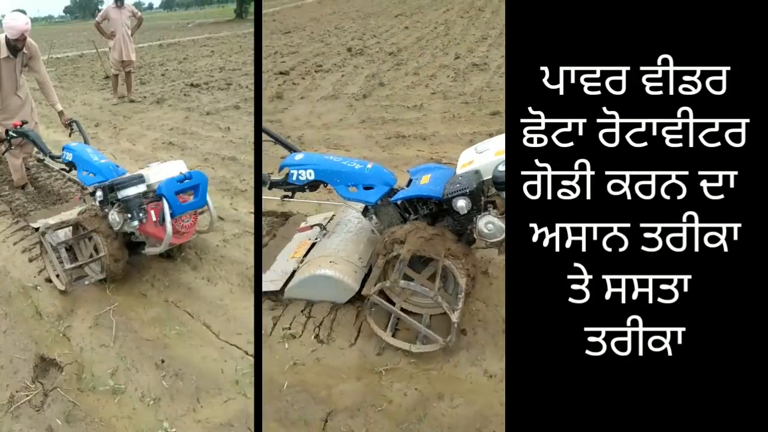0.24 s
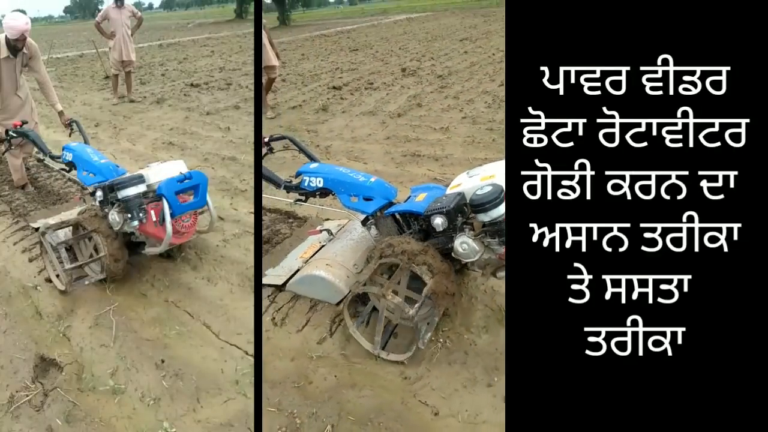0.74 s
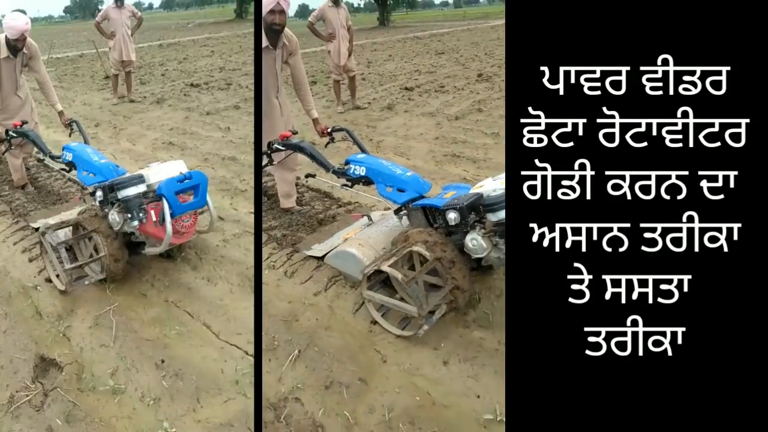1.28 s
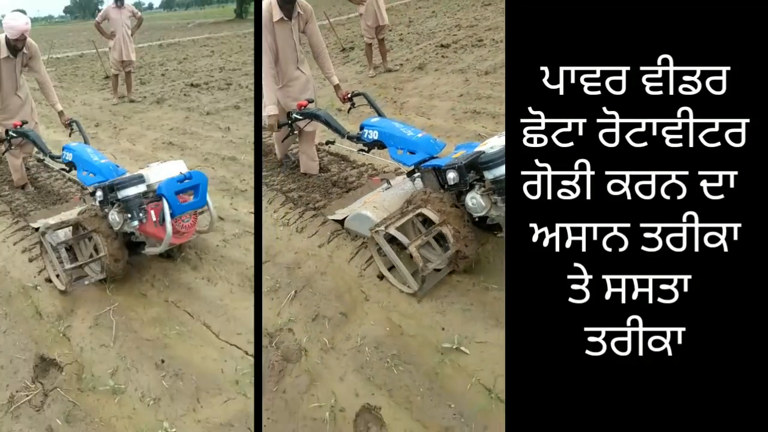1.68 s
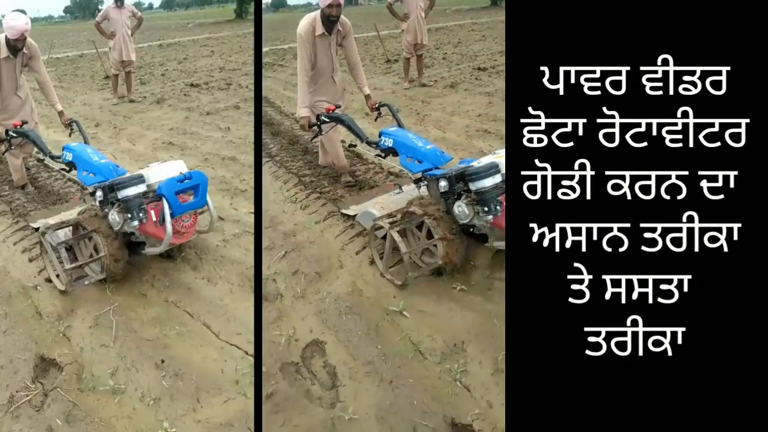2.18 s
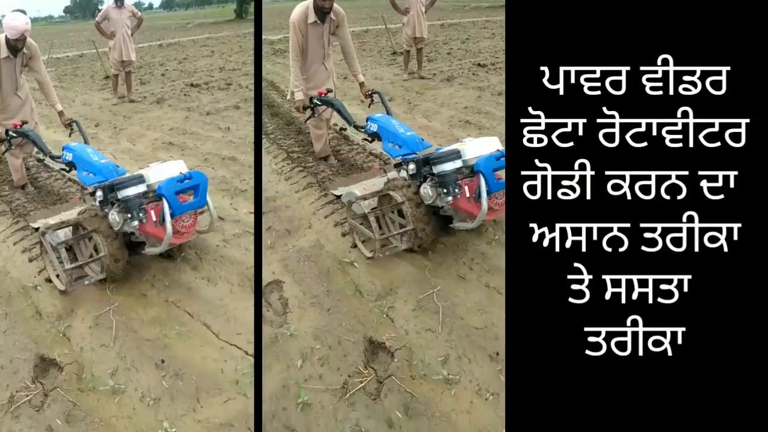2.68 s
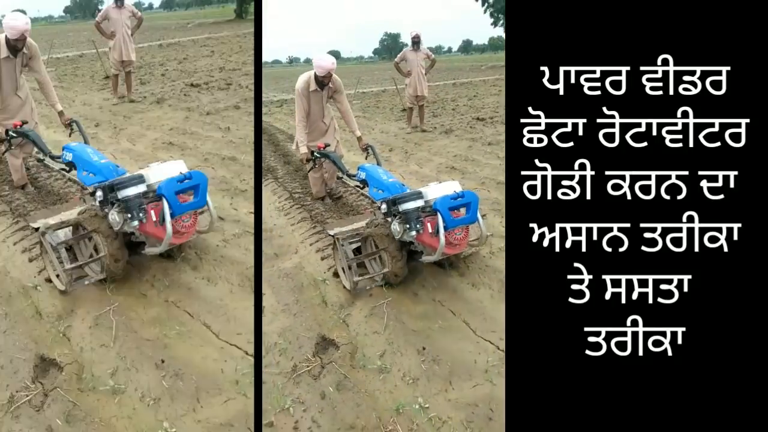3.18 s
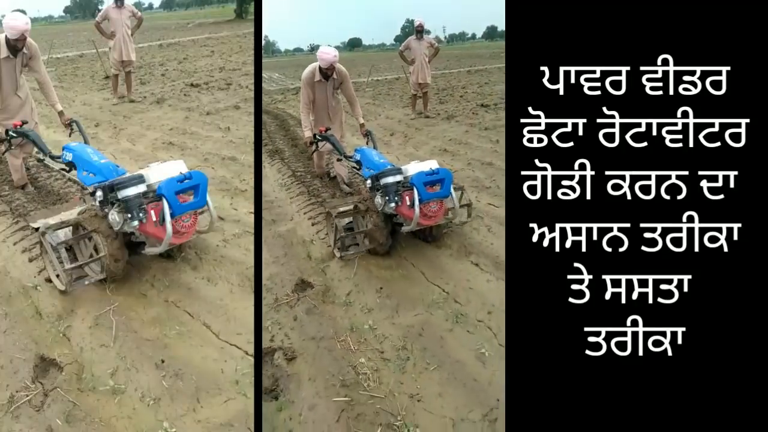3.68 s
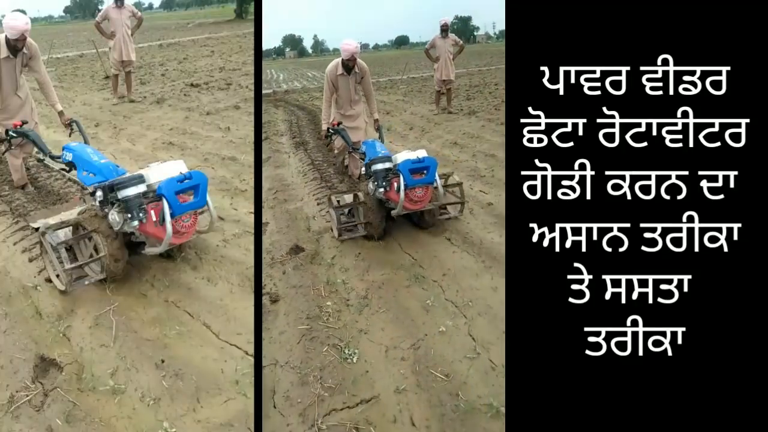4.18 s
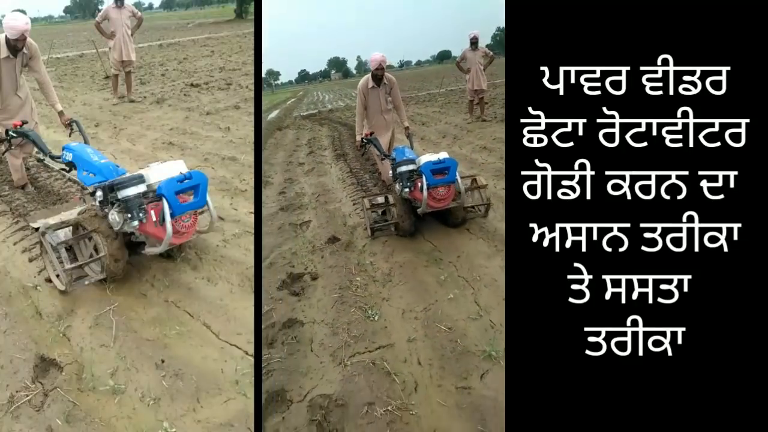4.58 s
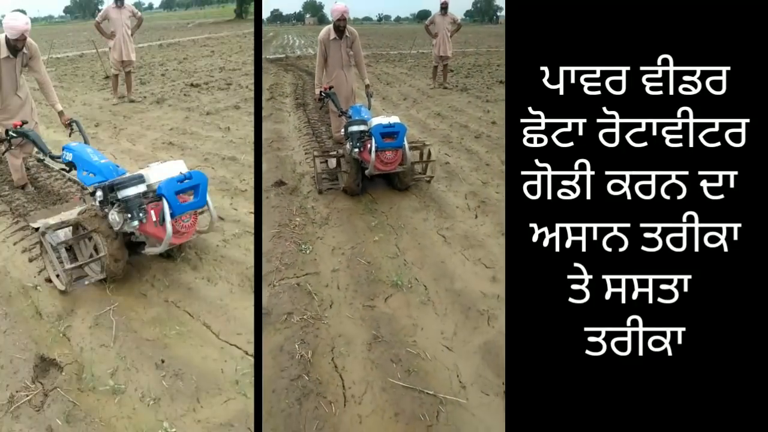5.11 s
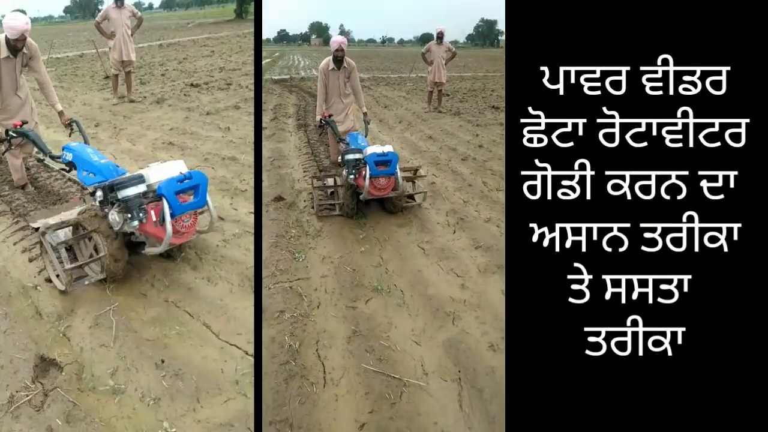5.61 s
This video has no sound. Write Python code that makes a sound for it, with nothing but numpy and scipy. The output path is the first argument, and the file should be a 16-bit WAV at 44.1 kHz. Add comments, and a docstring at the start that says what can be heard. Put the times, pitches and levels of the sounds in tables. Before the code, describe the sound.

In an open field, a walk-behind tiller with a small single-cylinder engine runs steadily close to the microphone. Fast, even thumps carry crisp bursts of exhaust hiss, a metallic ring, gear clatter and intake honk. Tines churn wet soil with a lumpy rumble, grit ticks on the hood, and a few dull clods thud. The machine moves away, its ring and intake fading while the hissing chug persists.

```python
"""An open field of wet soil, where a walk-behind tiller draws away from a microphone about 1.4 m off at first.
Its single-cylinder four-stroke engine fires about twenty times a second: each exhaust stroke thumps in the
muffler, spits a noise burst of hiss and rings the steel shell; the intake gulps in between through resonances.
Knocks and whirr colour the gear casing, loose parts buzz, tines churn the earth as shaped noise,
clods thud under the wheels and random ticks of grit strike the hood."""
import sys
import numpy as np
from scipy import signal
from scipy.fft import rfft, irfft, next_fast_len
from scipy.io import wavfile
from scipy.ndimage import uniform_filter1d, map_coordinates

SR = 44100
rng = np.random.default_rng(int(sys.argv[2]) if len(sys.argv) > 2 else 0)


def master_out(mix):
    """Clip the mix to full scale and print it as 16-bit PCM to the path in sys.argv[1]."""
    frames = np.transpose(np.atleast_2d(mix))
    ceiling = np.clip(frames, -1, 1)
    pcm = np.round(ceiling * 32767).astype(np.int16)
    wavfile.write(sys.argv[1], SR, pcm)


N = 257984

START_M, AWAY_M_PER_S = 1.41, 0.27  # distance from the microphone and how fast it grows
MACHINE_DB = -38.5  # reference for clatter and digging at one metre, before each layer's own gain
TOP_HZ = 15700  # upper band limit of the recorder
FIRST_OPENING_CYCLES = 0.627  # engine cycles until the exhaust valve first opens
BRIGHT_SCATTER_DB, FIZZ_SCATTER_DB = 1.5, 8.5  # from one firing to the next
PEAK_WANDER_HZ = 86  # random wander of the pitch at which the shell's ring stands out

# All table levels are relative; each layer adds its own gain.
# Dull thuds of earth under the wheels: start_s, level_db
THUDS = [(.09, -51), (.68, -29), (3.88, -39), (3.97, -43), (4.92, -30)]
# Colour of those thuds: frequency_hz, gain_db
THUD_SPECTRUM = [(25, -37), (75, -4.5), (150, -13.5), (230, -24.0), (400, -46), (2000, -80)]
# Colour of the churned soil: frequency_hz, gain_db
SOIL_SPECTRUM = [(20, -14), (45, 3.5), (80, 2), (170, -2.5), (330, -4.5), (550, -1.5), (750, -13),
                 (1100, -7), (2600, -14), (4000, -10.5), (9000, -50), (15000, -23)]
# Colour of the thin steel panels and hood: frequency_hz, gain_db
PANEL_SPECTRUM = [(800, -14.5), (2200, -47), (3300, -11.5), (4700, -9), (5400, -3), (7000, 1), (8600, 3),
                  (10000, 1.5), (12000, 0), (13000, -6), (15500, -27)]
# Colour of the gears, also used for crumbs on the hood: frequency_hz, gain_db
GEAR_SPECTRUM = [(300, -9.5), (550, -1), (740, -18), (880, 0.5), (1050, 2.5), (1200, 4), (1450, 0),
                 (1700, -6.5), (2500, 2.5), (3200, -9), (5500, -10.5), (9000, -9.5), (12000, -9.5),
                 (15500, -30)]
# Loose parts that buzz for a while: loudest_s, pitch_hz, width_hz, level_db, half_length_s
RATTLES = [(0.165, 5360, 400, -38, 0.16), (0.292, 2330, 130, -39, 0.027), (0.683, 8500, 700, -28.5, 0.065),
           (0.76, 2590, 150, -36, .07), (1.113, 2250, 258, -41, 0.091), (1.427, 1400, 130, -45, 0.076),
           (1.547, 5370, 300, -40, 0.27), (1.916, 2100, 200, -35, 0.031), (2.057, 1020, 260, -45, 0.14),
           (2.423, 1950, 130, -44, 0.13), (2.867, 1910, 130, -41, 0.039), (3.564, 1870, 130, -41.5, 0.027),
           (3.627, 1190, 198, -44.5, .05), (3.695, 1484, 90, -49, 0.83), (4.534, 4100, 900, -34, 0.017),
           (5.414, 2310, 250, -50.5, 0.46), (5.716, 950, 300, -46.5, 0.17)]
# Knocks of one engine cycle: share_of_cycle, level_db, rise_s
KNOCKS = [(.07, -0.5, 0.0026), (.42, 0, 0.0037), (.80, 0, 0.0047), (.92, 0.5, 0.0011)]
# Crankshaft speed, sagging as the tines bite and recovering under the governor: time_s, speed_rpm
CRANK_SPEED = [(0.0, 2407.0), (0.86, 2438.0), (1.35, 2380.0), (1.58, 2433.0), (1.8, 2439.0), (2.29, 2418.0),
               (2.52, 2369.0), (2.97, 2428.0), (3.11, 2430.0), (3.5, 2372.0), (4.16, 2351.0),
               (4.99, 2421.0), (5.18, 2390.0), (5.4, 2412.0), (5.85, 2397.0)]
# How much intake sound reaches the microphone as the machine turns away: time_s, level_db
FACING = [(0, -40.5), (.25, -35), (.8, -37.5), (1.3, -32.5), (1.9, -38.5), (2.6, -38), (3.7, -41),
          (4.5, -44.5), (5.85, -63)]
# Load on the engine: time_s, exhaust_thump_db, air_box_db
LOAD = [(0.0, -35, -40), (0.5, -35, -39.5), (1.5, -35, -42), (3.5, -35.5, -40.5), (4.3, -36.5, -40.5),
        (5.0, -38, -40.5), (5.85, -37, -41)]
# Resonances of the intake's air box: pitch_hz, width_hz, level_db
AIR_BOX_MODES = [(177.2, 3.7, 2.1), (234.3, 19, 2.1)]
# Resonances of the intake snorkel: pitch_hz, width_hz, level_db
SNORKEL_MODES = [(437.8, 17, 5), (488, 46, 2), (606, 20, -4)]
# Resonances of the flat filter cover: pitch_hz, width_hz, level_db
COVER_MODES = [(284, 6, 2), (341, 8.5, -9.5), (388, 5.6, 3.5)]
# Resonances of the steel muffler shell: pitch_hz, width_hz, level_db
SHELL_MODES = [(2057, 250, 0.5), (2308, 53, 0.5), (2420, 33, 2.5), (2640, 114, -0.5)]
# Level of the muffler shell's ring: time_s, level_db
SHELL_LEVEL = [(0, -36.5), (1.15, -32.5), (1.9, -36.5), (2.45, -33), (3.6, -35), (4.7, -43.5), (5.25, -50),
               (5.85, -43)]
# Pitch at which the shell's ring stands out most: time_s, pitch_hz
SHELL_PEAK = [(0, 2260), (1.2, 2400), (2.3, 2210), (3.2, 2520), (3.6, 2300), (4.7, 2500), (5.85, 2220)]
# Force of the exhaust blow-down as the throttle hunts: time_s, level_db
BLOWDOWN = [(0.03, -15.5), (0.28, -25), (0.33, -32), (0.38, -21.5), (0.53, -29), (0.58, -21.5), (1.07, -21),
            (1.12, -23.5), (1.47, -23), (2.01, -33.5), (2.06, -23), (2.96, -20.5), (3.01, -37.5),
            (3.06, -28), (3.36, -31), (3.51, -21.5), (3.71, -26), (3.87, -19.5), (4.02, -24), (4.43, -16.5),
            (4.73, -26), (5.82, -21)]
# Exhaust treble over its lower hiss: time_s, around_11_khz_db, above_12_khz_db
TREBLE = [(0, -1.5, 18.5), (.3, -5, 3), (.65, -7, -2), (.9, 3, -9), (1.4, -1, -4.5), (1.8, -9, -1.5),
          (2.3, -0.5, 6), (3.5, -0.5, 2.5), (4.4, 3, -1), (5.0, 5.5, 2.5), (5.85, 9.5, 4.5)]
# Colour of the exhaust jet: frequency_hz, gain_db
JET_SPECTRUM = [(500, -67), (1000, -28.5), (1600, -26), (2100, -28), (3300, -20), (4800, -15.5),
                (5300, -10), (7200, -4.5), (9600, 1), (11500, -1.5), (13000, -7.5), (15500, -12)]
# Resonances of the exhaust outlet: pitch_hz, width_hz, level_db
OUTLET_MODES = [(4100, 30, -2), (5340, 50, -8), (8700, 40, -21)]
# Resonances of the air in the muffler: pitch_hz, width_hz, level_db
MUFFLER_MODES = [(61.3, 20, -4.5), (103.8, 15.6, 5), (138.3, 9.9, -9.5)]


def amp(db):
    """Decibels to gain."""
    return 10 ** (np.asarray(db) / 20)


def unit(x):
    """Scale to rms 1."""
    return x / np.sqrt(np.mean(x ** 2) + 1e-20)


def curves(rows):
    """One value per sample for each column after the time."""
    time_s, *columns = np.transpose(rows)
    return [np.interp(np.arange(N) / SR, time_s, column) for column in columns]


def wobble(rate):
    """A smooth random curve, rate knots a second."""
    knots = rng.standard_normal(int(N * rate / SR) + 4)
    return map_coordinates(knots, [np.arange(N) * rate / SR])


def filtered(x, response):
    """Multiply the spectrum of x by a response given as a function of frequency."""
    size = next_fast_len(len(x) + SR // 2)
    spectrum = rfft(x, size) * response(np.fft.rfftfreq(size, 1 / SR))
    return irfft(spectrum, size)[:len(x)]


def coloured(x, spectrum):
    """Shape x by frequency_hz, gain_db points on a log frequency axis."""
    hz, db = np.transpose(spectrum)
    return filtered(x, lambda f: amp(np.interp(np.log(f + 1), np.log(hz), db)))


def resonate(x, modes):
    """Pass x through parallel causal resonances of alternating sign."""
    def response(f):
        total = 0
        for k, (hz, width, db) in enumerate(modes):
            damping = 1j * f * width
            total = total - (-1) ** k * amp(db) * damping / (hz * hz - f * f + damping)
        return total
    return filtered(x, response)


def strokes(cycle, share, scatter_db, jitter_s):
    """One impulse per engine cycle at the given share of it, uneven in size and time."""
    turns = np.arange(np.ceil(cycle[0] - share), cycle[-1] - share) + share
    size, late = rng.standard_normal((len(turns), 2)).T
    at = np.interp(turns, cycle, np.arange(N)) + late * jitter_s * SR
    return np.bincount(np.clip(at, 0, N - 1).astype(int), amp(scatter_db * size), N)


def gusts(impulses, peak_s, steep):
    """Noise that swells for peak_s after each impulse and dies away; steep makes the hump compact."""
    age = np.arange(SR // 4) / SR / peak_s
    shape = (age * np.exp(1 - age)) ** steep
    return signal.fftconvolve(impulses, shape)[:N] * rng.standard_normal(N)


def patchy(x, depth_db):
    """The colour flickers: random gain patches about a kilohertz wide and a few hundredths of a second long."""
    z = signal.stft(x, nperseg=256)[2]
    field = uniform_filter1d(rng.standard_normal(z.shape), size=5, axis=0)
    field = uniform_filter1d(field, size=10, axis=1)
    return signal.istft(z * amp(depth_db * unit(field)), nperseg=256)[1][:N]


def per_firing(cycle):
    """A random value that holds for one engine cycle."""
    firing = np.floor(cycle - np.floor(cycle[0])).astype(int)
    return rng.standard_normal(firing[-1] + 1)[firing]


def nearness_db():
    """Level of clatter and digging, falling with distance as the machine draws away."""
    return MACHINE_DB - 20 * np.log10(START_M + AWAY_M_PER_S * np.arange(N) / SR)


def off_axis_db():
    """Level lost, against the best-facing moment, as the machine turns from the microphone."""
    facing_db, = curves(FACING)
    return facing_db - facing_db.max()


def thuds(body_db):
    """Clods give way under the cage wheels with a soft, low bump."""
    start_s, level_db = np.transpose(THUDS)
    impulses = np.bincount((start_s * SR).astype(int), amp(level_db), N)
    return amp(body_db) * coloured(gusts(impulses, peak_s=0.025, steep=1.0), THUD_SPECTRUM)


def tines(lump_db, crumb_db, fade_db):
    """Blades churn wet earth: a lumpy rumble with crumbs pattering on the hood."""
    churn = unit(coloured(rng.standard_normal(N), SOIL_SPECTRUM)) * amp(lump_db * wobble(13.0))
    hits = (rng.random(N) < 70 / SR) * rng.uniform(0.38, 1, size=N)  # about 70 a second
    crumbs = unit(coloured(gusts(hits, peak_s=0.0012, steep=0.59), GEAR_SPECTRUM))
    # as the machine turns, its body slightly hides the blades
    hidden_db = fade_db * np.linspace(0, 1, N) ** 2
    return amp(nearness_db() + hidden_db) * (churn + amp(crumb_db) * crumbs)


def grit(grit_db, per_s, scatter_db, beaming):
    """Grit flung by the tines ticks on the thin steel of the hood, clearest from the side."""
    hits = (rng.random(N) < per_s / SR) * amp(scatter_db * rng.standard_normal(N))
    ticks = unit(coloured(gusts(hits, peak_s=0.00081, steep=0.49), PANEL_SPECTRUM))
    return amp(grit_db + beaming * off_axis_db()) * ticks


def rattles(cycle):
    """Loose guards and brackets are shaken by the firings and buzz, each at its own pitch."""
    t = np.arange(N) / SR
    firings = strokes(cycle, 0.0097, scatter_db=1.5, jitter_s=0.0012)
    shake = gusts(firings, peak_s=0.0056, steep=0.25)
    total = np.zeros(N)
    for loudest_s, hz, width_hz, db, half_length_s in RATTLES:
        swell = np.exp(-((t - loudest_s) / half_length_s) ** 2)
        total += amp(db) * swell * unit(resonate(shake, [(hz, width_hz, 0)]))
    return total


def clatter(cycle, knock_db, whirr_db):
    """Piston and valve gear knock at fixed crank angles over the whirr of fan and gears."""
    knocks = np.zeros(N)
    for share, db, rise_s in KNOCKS:
        hits = strokes(cycle, share, scatter_db=6.5, jitter_s=0.00099)
        knocks += amp(db) * gusts(hits, peak_s=rise_s, steep=1.0)
    drive = amp(knock_db) * unit(knocks) + amp(whirr_db) * rng.standard_normal(N)
    # the casing's many modes colour the clatter a little differently from moment to moment
    casing = np.zeros(N)
    for hz in np.geomspace(880, 1750, num=9):
        casing += resonate(drive, [(hz, 45, 0)]) * amp(2.5 * wobble(3))
    return amp(nearness_db()) * coloured(amp(2) * drive + amp(6) * casing, GEAR_SPECTRUM)


def intake(cycle, box_db, honk_db, cover_db, breathy, beaming):
    """The gulp of air booms in the air box, honks in its snorkel and shakes the flat filter cover."""
    facing_db, = curves(FACING)
    _, load_db = curves(LOAD)
    gulp = strokes(cycle, 0.6, scatter_db=-0.55, jitter_s=0.00032)
    turbulence = gusts(gulp, peak_s=0.00054, steep=0.58)

    def ring(modes):
        return unit(unit(resonate(gulp, modes)) + breathy * unit(resonate(turbulence, modes)))

    boom = amp(load_db + box_db) * unit(resonate(gulp, AIR_BOX_MODES))
    honk = amp(honk_db) * ring(SNORKEL_MODES)
    # the flat cover radiates in a narrower beam, so it fades more as the machine turns
    cover = amp(cover_db + beaming * off_axis_db()) * ring(COVER_MODES)
    return boom + amp(facing_db) * (honk + cover)


def shell_ring(cycle, ring_db, spread_hz):
    """Each firing shakes the muffler shell; which of its modes stands out drifts over time."""
    level_db, = curves(SHELL_LEVEL)
    centre_hz = curves(SHELL_PEAK)[0] + PEAK_WANDER_HZ * wobble(7.8)
    firings = strokes(cycle, 0.03, scatter_db=2.5, jitter_s=0.00026)
    shake = gusts(firings, peak_s=0.0038, steep=0.37)
    ring = np.zeros(N)
    for mode in SHELL_MODES:
        ring += resonate(shake, [mode]) / (1 + ((mode[0] - centre_hz) / spread_hz) ** 2)
    return amp(level_db + ring_db) * unit(ring)


def exhaust_hiss(cycle, jet_db, panel_db, outlet_db, beaming):
    """Gas spits from the outlet in short bursts; the thin steel around it sizzles on."""
    force_db, = curves(BLOWDOWN)
    bright_db, fizz_db = curves(TREBLE)
    opening = strokes(cycle, 0.0014, scatter_db=1.4, jitter_s=0.000043) * amp(force_db)
    burst = gusts(opening, peak_s=0.0068, steep=4.5)
    # the many close modes of the panels merge into a longer, softer tail
    tail = gusts(opening, peak_s=0.013, steep=1.64)
    jet = amp(jet_db) * coloured(burst, JET_SPECTRUM)
    panels = amp(panel_db) * coloured(tail, PANEL_SPECTRUM)
    hiss = patchy(jet + panels, depth_db=2.6)
    # each firing has its own colour: energy moves up or down the treble at about the same total power
    upper = filtered(hiss, lambda hz: 1 / (1 + (9500 / (hz + 1)) ** 20))
    top = filtered(hiss, lambda hz: 1 / (1 + (12200 / (hz + 1)) ** 20))
    bright = amp(bright_db + BRIGHT_SCATTER_DB * per_firing(cycle))
    fizz = amp(fizz_db + FIZZ_SCATTER_DB * per_firing(cycle))
    total = np.sqrt(0.36 + 0.49 * bright ** 2 + 0.15 * fizz ** 2)  # shares of the power
    tilted = (hiss - upper + bright * (upper - top) + fizz * top) / total
    # the outlet's ring fades as the machine turns away
    outlet = amp(outlet_db + beaming * off_axis_db()) * resonate(burst, OUTLET_MODES)
    return tilted + outlet


def exhaust_thump(cycle, thump_db):
    """Each blow-down kicks the air in the muffler, which resonates."""
    load_db, _ = curves(LOAD)
    kicks = strokes(cycle, 0, scatter_db=0.35, jitter_s=0.0001)
    return amp(load_db + thump_db) * unit(resonate(kicks, MUFFLER_MODES))


def scene():
    """One crankshaft times every engine sound; a four-stroke cycle takes two turns."""
    rpm, = curves(CRANK_SPEED)
    cycle = np.cumsum(rpm / (2 * 60)) / SR - FIRST_OPENING_CYCLES
    earth = thuds(body_db=17.5) + tines(lump_db=-0.5, crumb_db=-5.5, fade_db=-0.5)
    earth += grit(grit_db=-41.5, per_s=90, scatter_db=10.5, beaming=1.0)
    loose = rattles(cycle)
    metal = clatter(cycle, knock_db=3.5, whirr_db=3.5)
    metal += shell_ring(cycle, ring_db=-7.0, spread_hz=380)
    air = intake(cycle, box_db=-4.5, honk_db=-9, cover_db=-9, breathy=0.23, beaming=1.0)
    exhaust = exhaust_hiss(cycle, jet_db=11.5, panel_db=-4.0, outlet_db=16.5, beaming=0.89)
    exhaust += exhaust_thump(cycle, thump_db=-1.0)
    return (earth + loose + metal + air + exhaust)[None]


def record(dry):
    """The recorder cuts steeply above its band limit, 1 dB every 18 Hz down to -120 dB."""
    def band_limit(hz):
        return amp(-np.clip((hz - TOP_HZ) / 18, 0, 120))
    return np.array([filtered(x, band_limit) for x in dry])


dry = scene()
out = record(dry)
master_out(out)
```